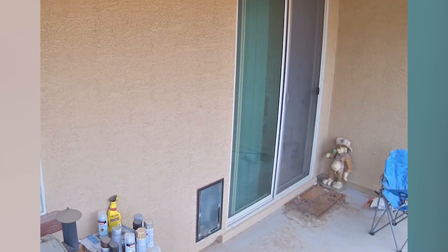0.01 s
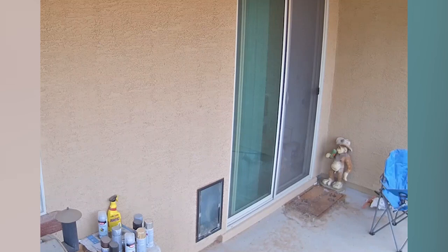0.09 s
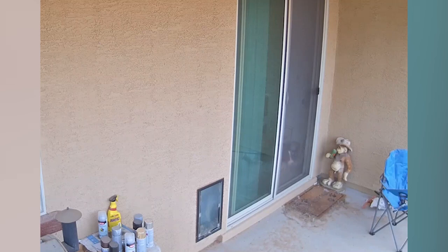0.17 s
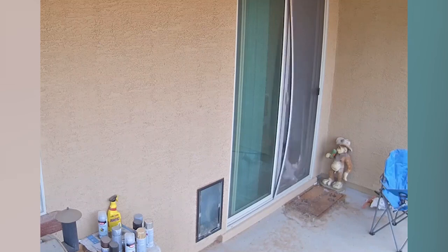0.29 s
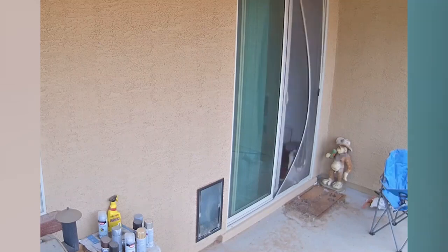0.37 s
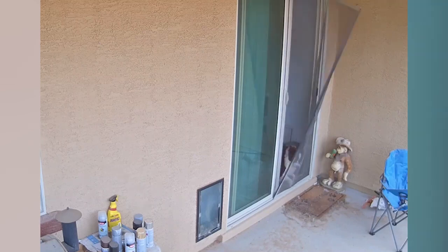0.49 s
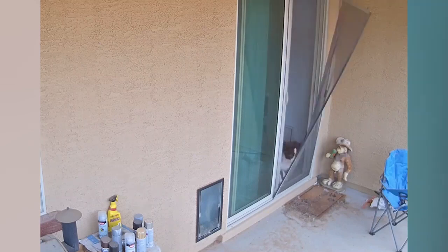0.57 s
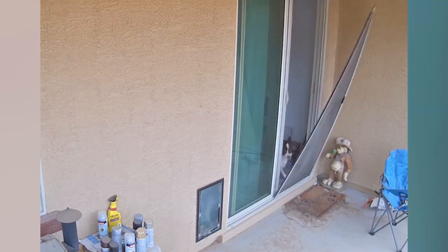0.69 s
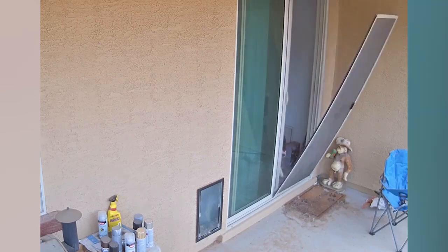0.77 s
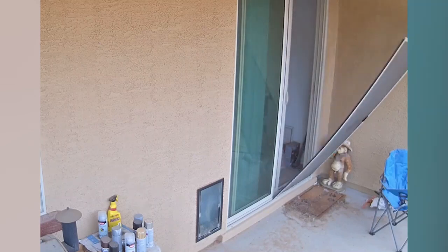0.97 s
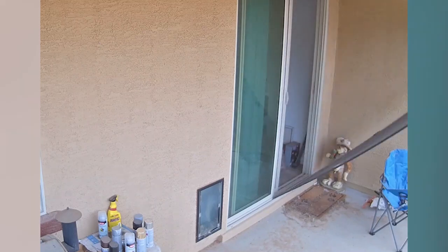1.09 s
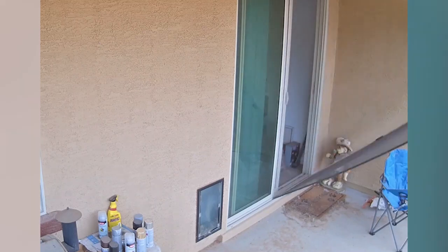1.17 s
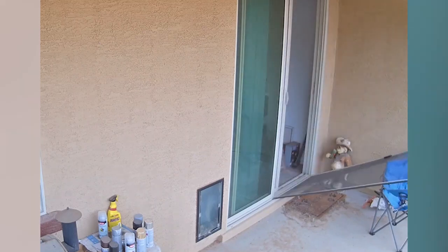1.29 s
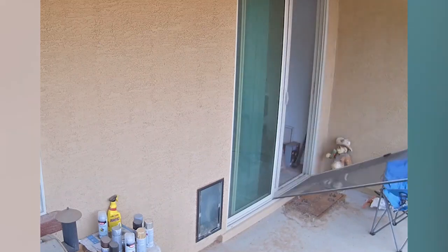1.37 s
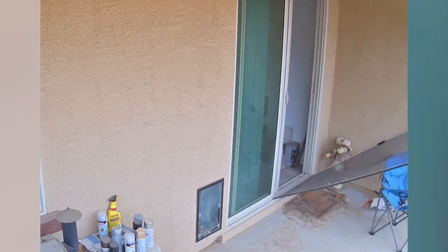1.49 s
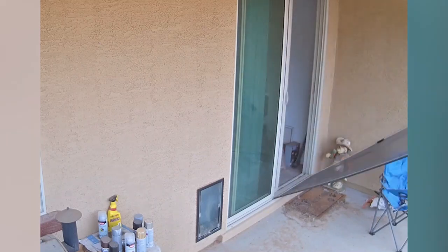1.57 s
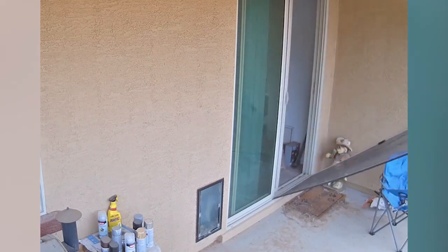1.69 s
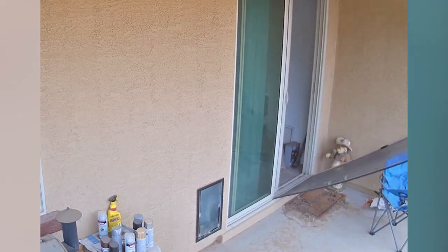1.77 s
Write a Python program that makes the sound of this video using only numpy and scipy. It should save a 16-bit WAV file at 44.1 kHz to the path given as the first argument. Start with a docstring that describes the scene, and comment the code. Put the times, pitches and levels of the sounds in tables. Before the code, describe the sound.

A light metal screen door crashes out of its track, rattling and clanging across a covered patio

```python
"""A light metal screen door is knocked out of its track on a covered patio and topples onto a chair.
Its frame rattles in dense ringing ticks, with a noisy mesh sizzle above and a low panel shudder below.
Damped two-pitch snaps, clustered-tick knocks and low swinging thumps stand out of the rattle.
A camera microphone hears it with the patio's short reverberation, over a faint outdoor noise floor.
A limiter eases down the loudest peaks and the extreme top is cut."""
import sys
import numpy as np
from scipy import signal
from scipy.fft import rfft, irfft
from scipy.io import wavfile
from scipy.ndimage import uniform_filter1d, minimum_filter1d

SR = 44100
rng = np.random.default_rng(int(sys.argv[2]) if len(sys.argv) > 2 else 0)


def generate_wav(sig):
    """Save sig (samples, or channels by samples) to the path in sys.argv[1] as 16-bit PCM at SR."""
    pcm = np.round(np.clip(np.atleast_2d(sig).T, -1, 1) * 32767).astype(np.int16)
    wavfile.write(sys.argv[1], SR, pcm)


N = 79380  # samples, 1.8 s

# broad colour of the frame's ticks and knocks: pitch_hz, gain_db
TICK_COLOUR = [(350, -22.5), (600, -39.5), (726, -16), (807, -19.5), (916, -12.5), (1190, -6.5), (1590, -1),
               (2300, -8), (3400, -8.5), (5180, -19), (6540, -39), (7500, -44.5), (9750, -66),
               (16500, -120)]
TICKS_PER_S = 1500  # mean rate of clicks in one group


def undb(db):
    """Amplitude ratio of a level in dB."""
    return 10 ** (np.asarray(db) / 20)


def unit(x):
    """Scale to an RMS of 1."""
    return x / np.sqrt(np.mean(x ** 2))


def curve(spans, axis):
    """Straight lines through one column of each stretch; its last value holds until the next blow."""
    t, out = np.arange(N) / SR, np.zeros(N)
    for rows in map(np.array, spans):
        level = np.interp(t, np.sort(rows[:, 0]), rows[:, axis])
        out = np.where(t >= rows[0, 0], level, out)
    first_s, first_value = spans[0][0][0], spans[0][0][axis]
    out = np.where(t < first_s, first_value, out)
    return uniform_filter1d(out, size=40)  # rounds the jumps over about 1 ms


def ring(x, hz, width_hz):
    """One resonance, gain 1 at the centre."""
    return signal.lfilter(*signal.iirpeak(hz, hz / width_hz, fs=SR), x)


def colour(x, points):
    """Causal minimum-phase filter whose gain runs through points of pitch_hz, gain_db."""
    p, size = np.array(points), 4096
    hz = np.arange(size // 2 + 1) * SR / size
    db = np.interp(np.log(hz + 1), np.log(p[:, 0]), p[:, 1])
    # folding the cepstrum forward in time gives the minimum phase
    cepstrum = irfft(np.log(undb(db)))
    cepstrum[1:size // 2] *= 2
    cepstrum[size // 2 + 1:] = 0
    response = irfft(np.exp(rfft(cepstrum)))[:size // 2]
    return signal.fftconvolve(x, response)[:len(x)]


def fade(t, t60):
    """Exponential decay from time 0, 60 dB down after t60 seconds; silent before."""
    return (t >= 0) * undb(-60 * np.maximum(t, 0) / t60)


def ticks(rate):
    """Random clicks of either sign, a few much larger than the rest."""
    scatter_db = 2  # mean of the exponential spread of levels
    u = rng.random((3, N))
    struck = u[0] < rate / SR
    return struck * np.sign(u[1] - .5) * undb(-scatter_db * np.log(u[2] + 1e-9))


def walk(rate):
    """Random levels joined by straight slews, rate of them a second, RMS 1."""
    k = int(SR / rate)
    steps = np.repeat(rng.standard_normal(N // k + 1), k)
    return unit(uniform_filter1d(steps, k)[:N])


def outdoors():
    """Faint outdoor floor: coloured noise with a slightly wandering level."""
    # spectrum of the outdoor floor: pitch_hz, gain_db
    air_colour = [(18, -32), (30, -6), (100, -4.5), (359, -16.5), (450, -7), (593, -20.5), (724, -9),
                  (842, -10.5), (3260, -14.5), (12000, -66), (15600, -101), (22000, -120)]
    level_db = -48.5
    air = unit(colour(rng.standard_normal(N), air_colour))
    return air * undb(level_db + 0.5 * walk(19))


def patio(door):
    """Reverberation of the covered patio: the door convolved with decaying, low-passed noise."""
    top_hz, t60_s, delay_s, level_db = 5370, 0.38, .006, -15
    t = np.arange(SR // 2) / SR
    noise = signal.lfilter(*signal.butter(2, top_hz, fs=SR), rng.standard_normal(len(t)))
    walls = noise * fade(t - delay_s, t60_s)
    walls = walls / np.sqrt(np.sum(walls ** 2))
    return undb(level_db) * signal.fftconvolve(door, walls)[:N]


def thumps():
    """Damped low swings as the frame strikes track, wall and chair."""
    # low thumps: start_s, relative_level_db, pitch_hz
    low_blows = [(0.194, -19, 484), (0.254, -10.5, 228.5), (0.371, -13.5, 127), (0.421, -10.5, 136),
                 (0.589, -18.5, 126), (0.691, -16.5, 115), (0.756, -10, 424), (1.2, -33, 424),
                 (1.245, -19, 418), (1.319, -40, 109), (1.589, -29.5, 45.5), (1.658, -30.5, 49),
                 (1.719, -34, 44.6)]
    t60_s, rise_s, level_db = 0.079, 0.0079, -3
    t, out = np.arange(N) / SR, np.zeros(N)
    for s, db, hz in low_blows:
        swing = np.sin(2 * np.pi * hz * (t - s)) * fade(t - s, t60_s)
        out += undb(db + level_db) * swing * np.clip((t - s) / rise_s, 0, 1)
    return out


def mesh():
    """Treble sizzle of the mesh: narrow noise bands, each flickering on its own."""
    # treble of the mesh: pitch_hz, gain_db
    sizzle_colour = [(3530, -16), (6000, 2), (6650, -20), (6900, -13.5), (8860, -14), (11100, -7),
                     (16000, -37)]
    flicker_db = 3
    patchy = np.zeros(N)
    for f in 6000 * 2 ** (np.arange(9) / 6):  # sixth-octave steps
        band = unit(ring(rng.standard_normal(N), f, f / 10))
        patchy += np.sqrt(1 / f) * band * undb(flicker_db * walk(44.95))
    return unit(colour(patchy, sizzle_colour))


def panel():
    """Low shudder: ticks ring each broad low mode of the door through two resonances in turn."""
    # low modes of door and glass: pitch_hz, base_width_hz (widened below), level_db
    low_modes = [(60, 39, -12), (129.6, 50, -1), (245.7, 39, -2), (343, 68, 0.5), (468.3, 60, -1),
                 (780, 64, -5)]
    shudder = np.zeros(N)
    for f, w, db in low_modes:
        mode = ring(ring(ticks(TICKS_PER_S), f, 1.82 * w), f, 4 * w)
        shudder += undb(db) * unit(mode)
    return unit(shudder)


def frame(rate):
    """Ticks of every pitch, each group on its own, plus the frame modes rung by sparser ticks."""
    # modes of the frame: pitch_hz, width_hz, relative_level_db
    frame_modes = [(929, 40, 3.5), (981.5, 12.6, -2), (1102.6, 35, -6.5), (1203, 54, 3.5), (1445, 42, 2),
                   (1602, 44, -7.5), (1692, 90, 0), (1932, 41, 3.5), (2142, 8.4, 3), (2340, 150, 7.5),
                   (2563, 130, 3.5), (2787, 51, -14), (3014, 46, -6), (3426, 130, 3)]
    ring_db = -7.5  # modes against ticks
    pitches = 500 * 2 ** (np.arange(14) / 3)  # third-octave steps
    grains = sum(ring(ticks(rate), f, f / 4) for f in pitches)
    modes = sum(undb(db) * unit(ring(ticks(rate / 4), f, w)) for f, w, db in frame_modes)
    return unit(colour(unit(grains) + undb(ring_db) * unit(modes), TICK_COLOUR))


def knocks():
    """Blurred knocks, short clusters of ticks around one pitch: quick rise, hold, release."""
    # blurred knocks: start_s, relative_level_db, pitch_hz, length_s (up to the release)
    blows = [(0.1965, -10, 1580, 0.0092), (0.2359, -0.5, 1910, 0.011), (0.275, -0.5, 1630, 0.012),
             (0.3, -3.5, 1620, 0.012), (0.333, -7, 1600, 0.0062), (0.4206, 5, 2570, 0.014),
             (0.4464, -7.5, 2070, 0.019), (0.619, -10, 1630, 0.016), (0.7045, -6.5, 1630, 0.013),
             (0.753, -1, 1750, 0.012), (0.8854, -12, 1770, 0.033), (0.993, -8, 1230, 0.01),
             (1.181, -20, 1480, 0.012), (1.202, -21.5, 1650, 0.011), (1.32, -23, 2320, 0.019),
             (1.4167, -8.5, 1160, 0.018), (1.448, -5.5, 1650, 0.0069), (1.5505, -17, 2430, 0.013),
             (1.624, -12.5, 1430, 0.008), (1.674, -17.5, 1770, 0.024), (1.735, -21.5, 1900, 0.022)]
    level_db, relative_width, rise_s, release_t60_s = -15, 0.32, 0.0069, 0.071
    t, out = np.arange(N) / SR, np.zeros(N)
    for s, db, hz, length in blows:
        cluster = ring(ticks(TICKS_PER_S * 5), hz, relative_width * hz)
        grain = unit(colour(cluster, TICK_COLOUR))
        release = np.where(t < s + length, 1, fade(t - s - length, release_t60_s))
        shape = np.clip((t - s) / rise_s, 0, 1) * release
        out += undb(db + level_db) * grain * shape
    return out


def snaps():
    """A few cycles at two pitches, a treble tick, one quick echo and a short jangle of the frame."""
    # sharp snaps: start_s, level_db, pitch_hz, relative_tick_level_db, upper_pitch_hz,
    # upper_level_db (against the first pitch), t60_s
    sharp_blows = [(0.2359, 2.5, 1938, -26, 3850, -11, 0.015), (0.3691, 0, 1870, -42, 2640, -8.5, 0.0098),
                   (0.6734, 1, 3000, -22.5, 3000, -15, 0.0085), (0.8485, 3, 3560, -21, 3240, -1, 0.0076),
                   (0.9682, 3.5, 1830, -25.5, 2600, -0.5, 0.0087), (1.2506, -2, 1600, -68, 2910, 0, 0.0074),
                   (1.3972, 5, 1880, -28.5, 2600, -6, 0.0086)]
    # treble of a snap: pitch_hz, gain_db
    tick_colour = [(3240, -12.5), (5500, 5), (6910, -40), (7620, -5.5), (10200, -10), (12500, -16),
                   (16000, -46)]
    echo_s, echo_db, tick_level_db = .0055, -8.5, 10
    jangle_db, jangle_t60_s = -20.5, 0.045
    onset_s, rise_s = .0003, 0.000597
    t, out = np.arange(N) / SR, np.zeros(N)
    jangle = frame(TICKS_PER_S)
    for s, db, hz, tick_db, upper_hz, upper_db, t60 in sharp_blows:
        for late, less_db in ((0, 0), (echo_s, echo_db)):
            d = t - s - late - onset_s
            tone = np.sin(2 * np.pi * hz * d) + undb(upper_db) * np.sin(2 * np.pi * upper_hz * d)
            rise = np.clip(d / rise_s, 0, 1) ** 2
            out += undb(db + less_db) * tone * fade(d, t60) * rise
        click = np.zeros(N)
        click[int((s + .0008) * SR)] = 1
        tick = colour(click, tick_colour)
        out += undb(tick_db + tick_level_db) * tick / np.abs(tick).max()
        out += undb(db + jangle_db) * jangle * fade(t - s, jangle_t60_s)
    return out


def rattle():
    """The frame chatters in its track, brighter or duller; the mesh sizzles above, the panel shudders below."""
    # rattle of the frame, one stretch from blow to blow:
    # start_s, level_db, brightness_db (used against its median), shudder_level_db, treble_level_db
    stretches = [
        [(0.172, -68, 3, -60, -77), (0.18, -39.5, 4.5, -44, -70), (0.202, -23, -10, -32.5, -56),
         (0.226, -24, -10.5, -30.5, -56)],
        [(0.24, -21, -19, -45, -51), (0.252, -18.5, -3.5, -27.5, -49.5), (0.4, -21.5, -9.5, -32.5, -48.5),
         (0.415, -22.5, 3.5, -37, -44)],
        [(0.423, -14.5, 5.5, -26, -41), (0.427, -19, -1, -22, -36.5), (0.543, -27, -14, -42.5, -63),
         (0.612, -22.5, -9, -36, -53.5)],
        [(0.622, -17.5, -4, -33, -56), (0.64, -23, -6.5, -33.5, -55), (0.664, -16, -16, -28.5, -44.5)],
        [(0.678, -21.5, 12.5, -49, -51), (0.684, -20, -4.5, -31, -43), (0.744, -25, -12, -36, -82),
         (0.748, -27, -13, -32, -46)],
        [(0.757, -10.5, -3.5, -50, -48), (0.769, -13.5, -9, -21.5, -46), (0.805, -19, -15.5, -37, -50),
         (0.839, -20.5, -5.5, -29, -48)],
        [(0.853, -16, -6, -44, -38), (0.857, -20, -3, -30, -56), (0.863, -18, -11, -32.5, -52),
         (0.958, -21, -10, -36.5, -53)],
        [(0.972, -10, -10, -47, -43), (0.98, -18.5, -15, -34, -54), (1.13, -35, -10, -48, -66),
         (1.2, -34, -9, -57.5, -66)],
        [(1.21, -21.5, -15, -35, -68), (1.226, -29, -31, -37, -67), (1.241, -27, -25, -42, -61)],
        [(1.255, -12.5, -14, -36, -70), (1.263, -19.5, -13, -33.5, -61), (1.287, -18.5, -16.5, -33.5, -54),
         (1.305, -23, -6.5, -32.5, -54)],
        [(1.314, -27, 1, -30.5, -58), (1.324, -19.5, -3, -29, -57), (1.387, -42, 3, -39.5, -61)],
        [(1.401, -16, -13, -44, -44), (1.407, -20.5, -21, -45, -70), (1.445, -26.5, -10.5, -40, -58),
         (1.61, -37.5, -11, -57, -64.5)],
        [(1.62, -25.5, -19, -58, -66), (1.642, -36.5, -9.5, -60.5, -64), (1.77, -36.5, -8.5, -58, -63),
         (1.8, -44, -8, -53, -76)],
    ]
    flicker_db, shudder_flicker_db = 2.0, 1.03
    body = frame(TICKS_PER_S)
    high = signal.sosfiltfilt(signal.butter(2, 2700, "high", fs=SR, output="sos"), body)
    bright = curve(stretches, axis=2)
    body = unit(body + (undb(bright - np.median(bright)) - 1) * high)
    body = body * undb(curve(stretches, axis=1) + flicker_db * walk(90))
    shudder = panel() * undb(curve(stretches, axis=3) + shudder_flicker_db * walk(25))
    sizzle = mesh() * undb(curve(stretches, axis=4))
    on = np.arange(N) / SR > stretches[0][0][0]
    return on * (body + sizzle + shudder)


def scene():
    """The door, its patio reverberation and the outdoor floor, in one channel."""
    door = rattle() + snaps() + knocks() + thumps()
    return (door + patio(door) + outdoors())[None]


def record(dry):
    """A quick limiter eases the gain down around peaks over the ceiling; the top is cut."""
    ceiling, top_hz = .78, 16000
    need = minimum_filter1d(ceiling / np.maximum(np.abs(dry), ceiling), size=61)
    gain = uniform_filter1d(uniform_filter1d(need, size=31), size=31)
    top_cut = signal.ellip(8, .2, 70, top_hz, fs=SR, output="sos")
    return signal.sosfilt(top_cut, dry * gain)


dry = scene()
out = record(dry)
generate_wav(out)
```